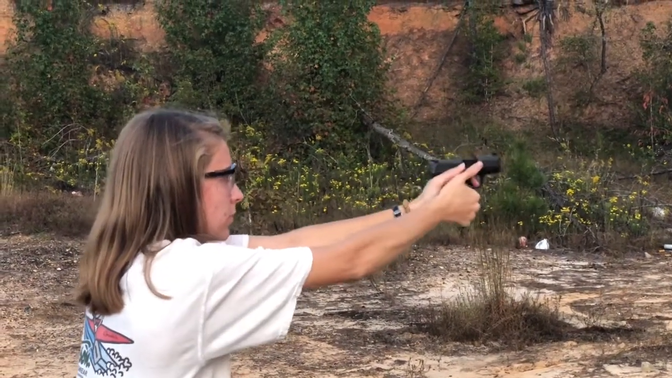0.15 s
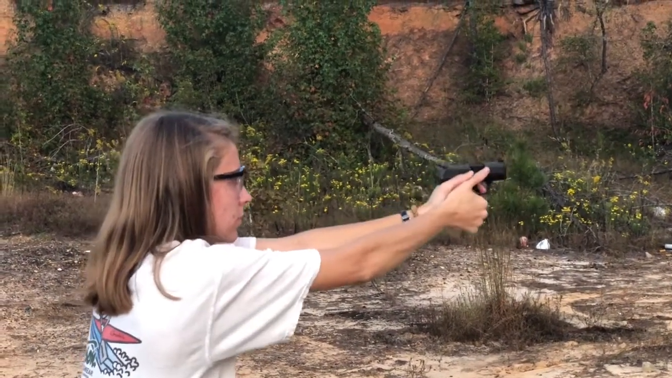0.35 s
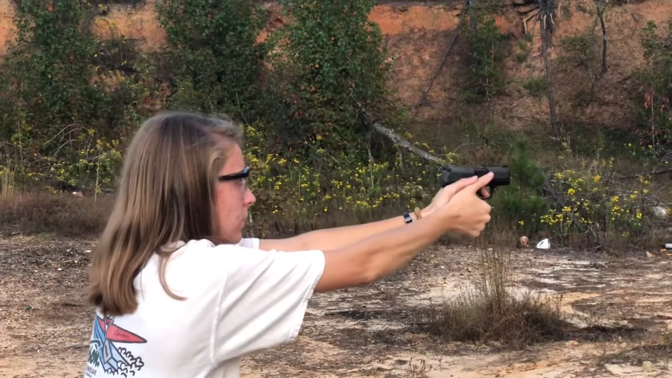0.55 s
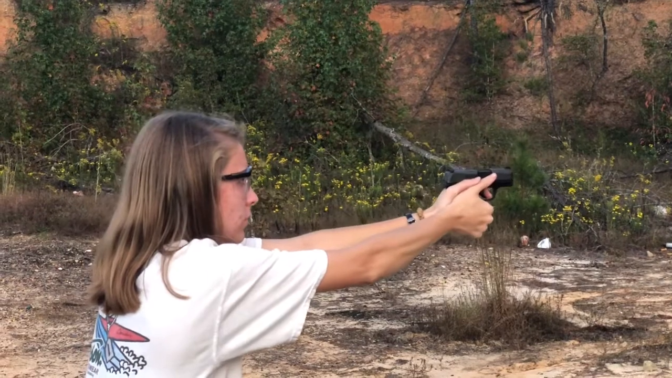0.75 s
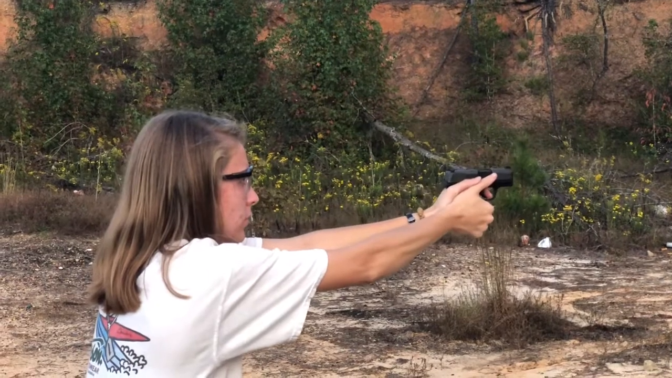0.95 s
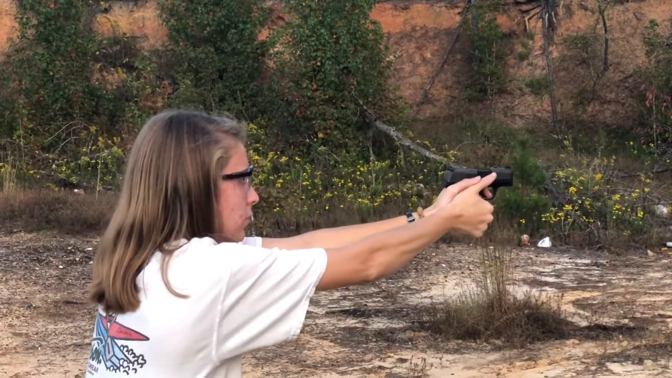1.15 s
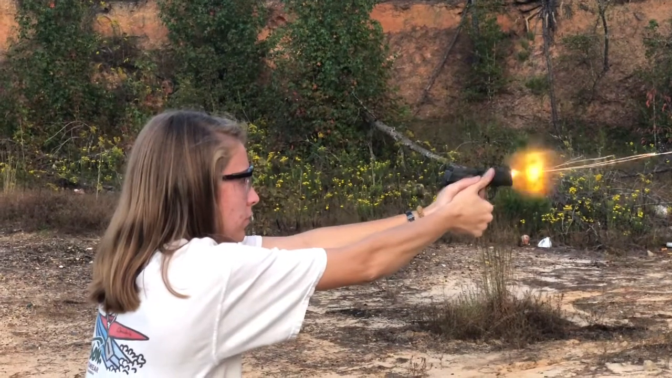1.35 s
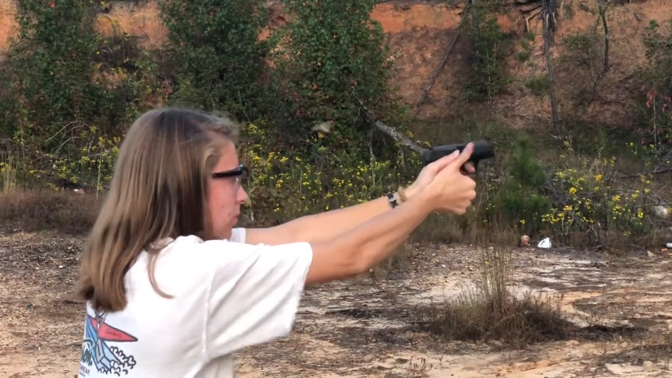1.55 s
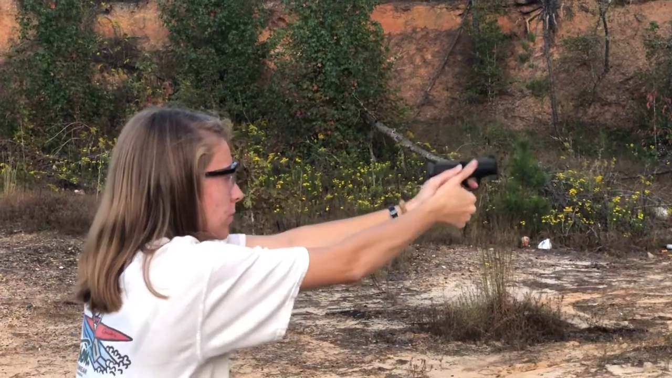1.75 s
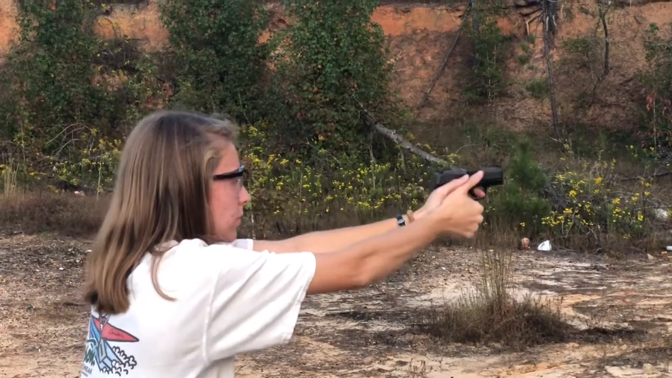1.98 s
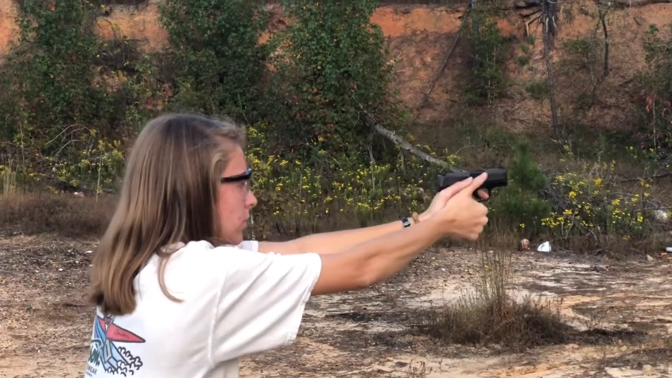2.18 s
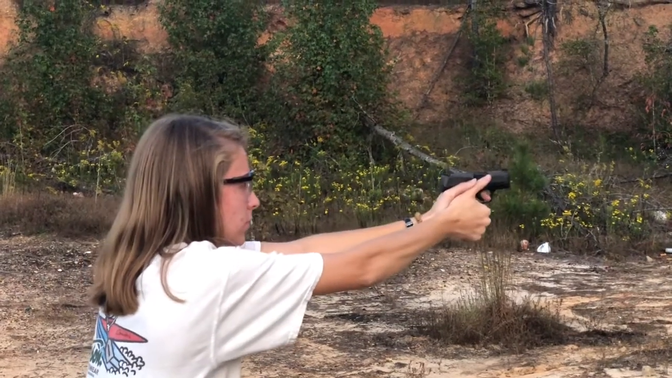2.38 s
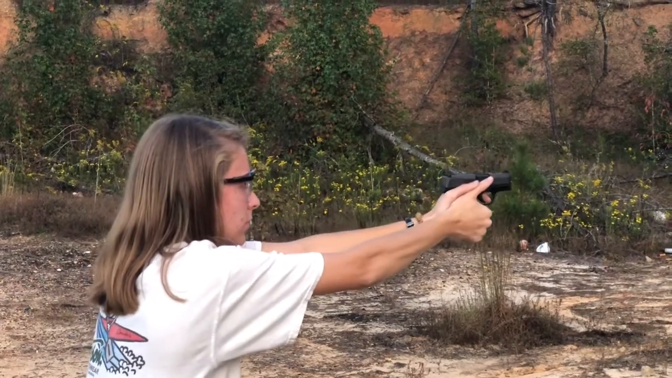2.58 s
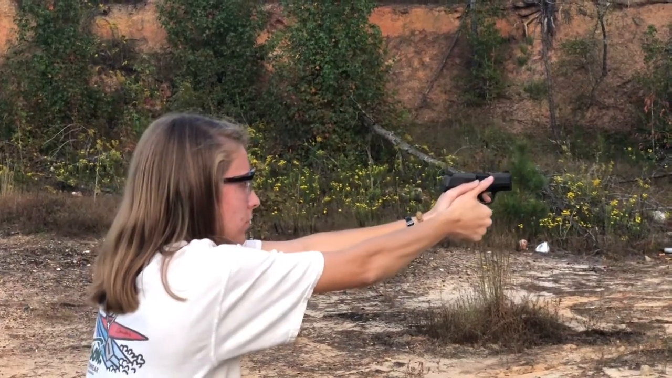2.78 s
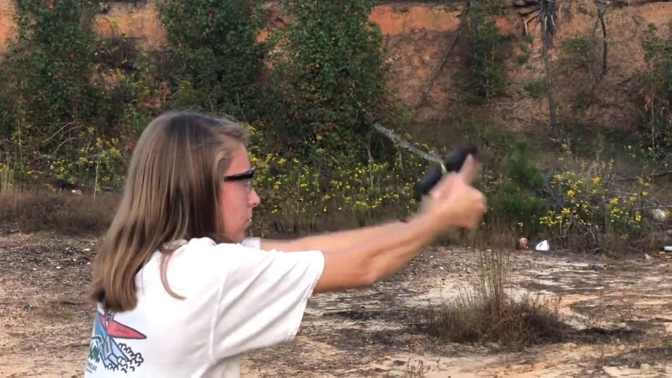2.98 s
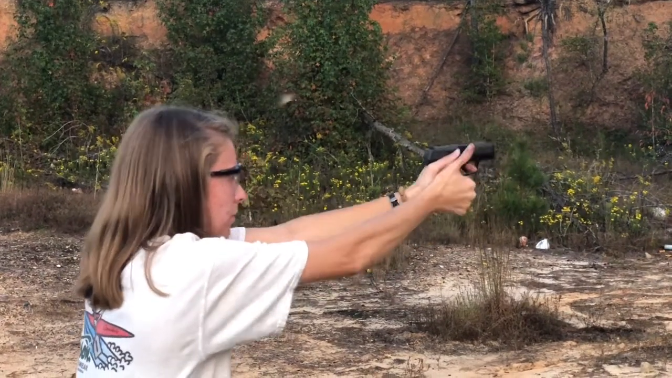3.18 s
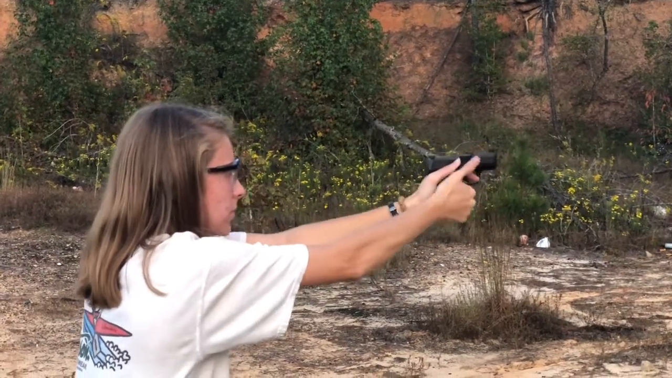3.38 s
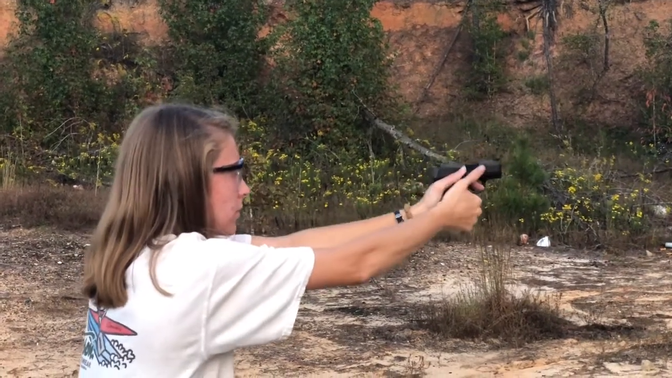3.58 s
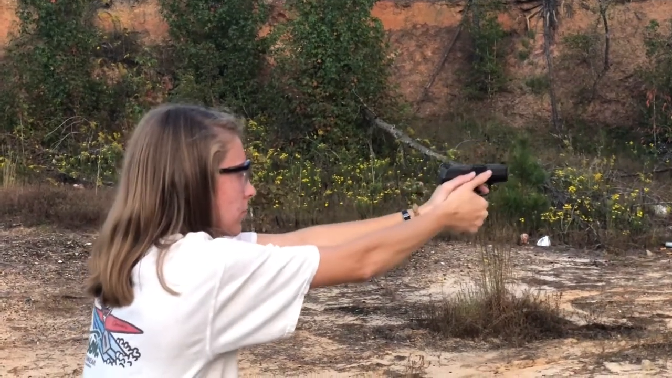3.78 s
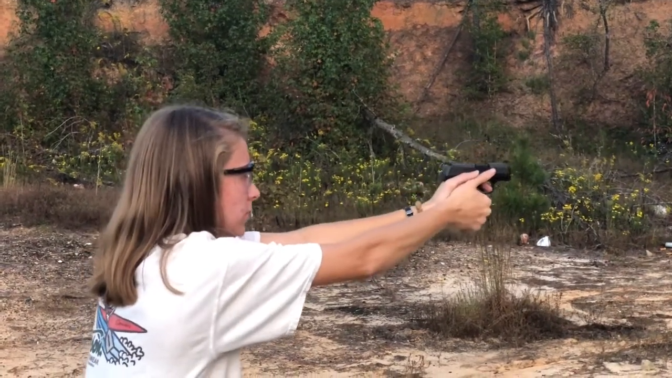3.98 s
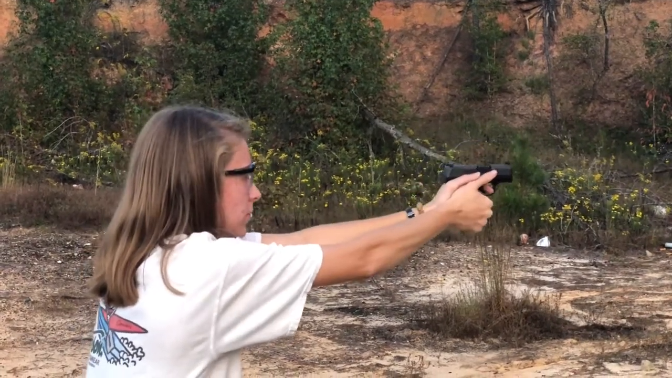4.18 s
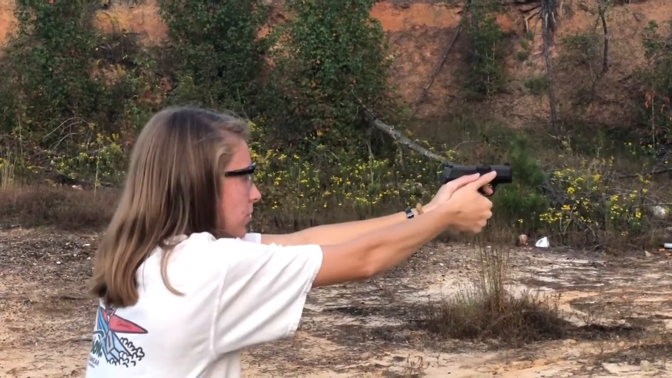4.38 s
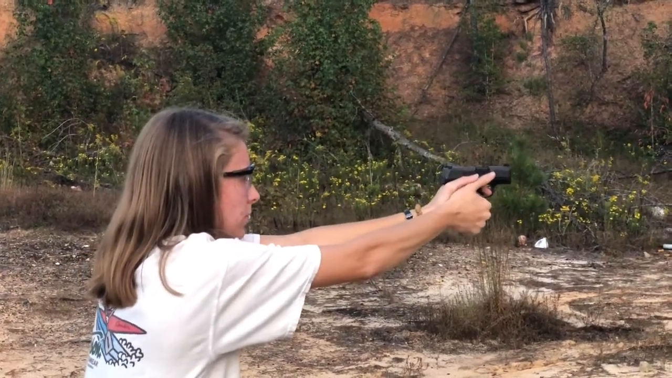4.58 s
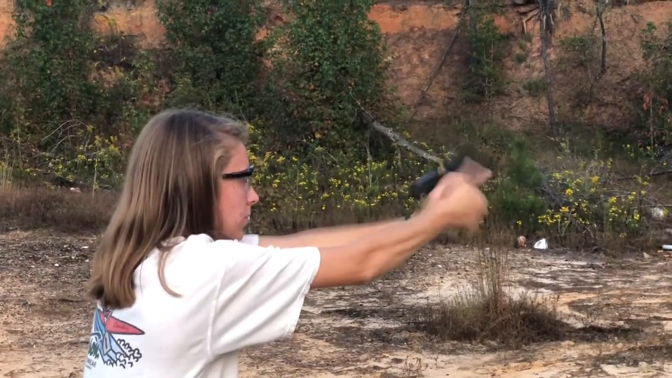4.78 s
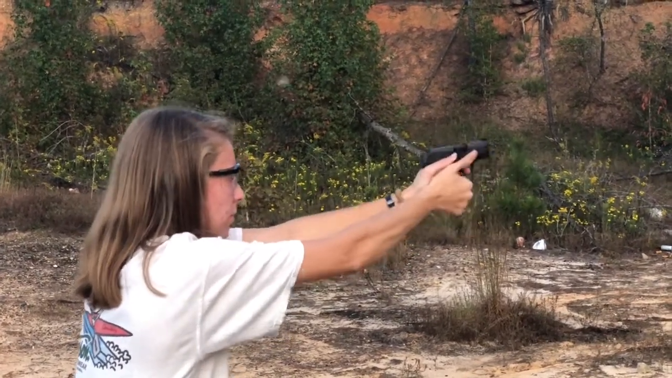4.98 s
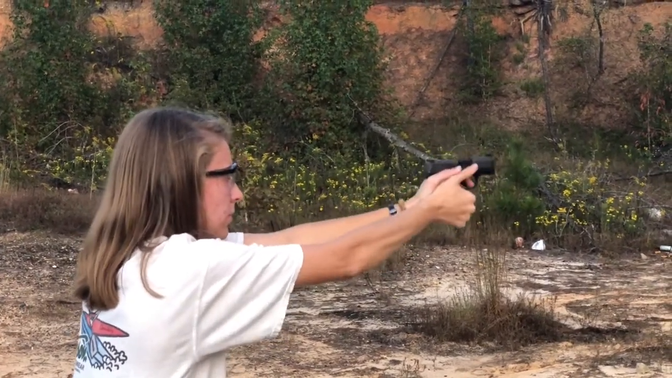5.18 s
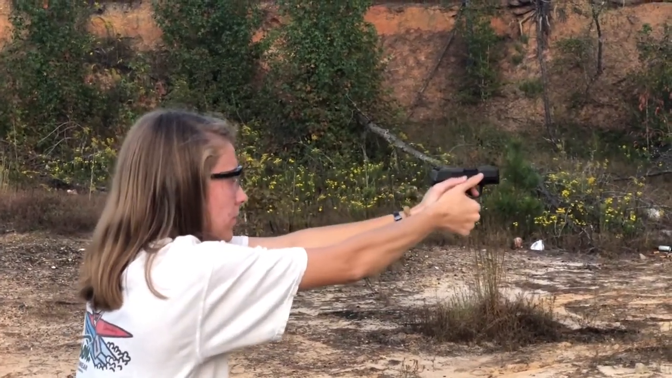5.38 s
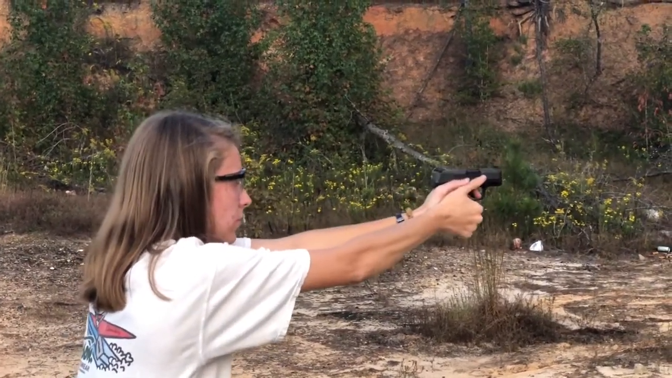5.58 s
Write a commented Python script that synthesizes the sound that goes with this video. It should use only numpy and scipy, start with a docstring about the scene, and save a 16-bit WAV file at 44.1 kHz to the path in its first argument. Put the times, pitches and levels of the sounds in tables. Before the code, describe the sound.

A pistol fires three sharp, close shots outdoors, each echoing away, with faint casing pings and distant insects in between.

```python
"""A semi-automatic pistol fires three aimed shots at an outdoor range, after the dying tail of another.
Each gas blast bounces off the ground, scatters from brush, booms from earth banks and lingers in far
woods; the slide slams shut and the casing lands with a ping. The small, close microphone overloads.
The recorder's gain drops at each shot and creeps back, lifting insects, faint rustle and a distant hum."""
import sys
import numpy as np
from scipy import signal
from scipy.fft import rfft, irfft, next_fast_len
from scipy.io import wavfile

SR = 44100
rng = np.random.default_rng(int(sys.argv[2]) if len(sys.argv) > 2 else 0)


def put_to_file(sound):
    """Save the sound as 16-bit audio at rate SR, in the file named by the first command-line argument."""
    columns = np.atleast_2d(sound).T  # one column per channel
    safe = np.clip(columns, -1, 1)
    whole_steps = np.round(safe * 32767)
    wavfile.write(sys.argv[1], SR, whole_steps.astype(np.int16))


N = 248724
TIME_S = np.arange(N) / SR
EVENT_S = np.arange(2 * SR) / SR

# noise spectra: f/Hz, level/dB
HUM_SPECTRUM = [(25, -14), (75, 6.5), (130, -3), (250, -13.5), (450, -12), (750, -8), (1150, -5.5),
                (1700, -16), (2700, -20), (5000, -27), (9000, -35), (16000, -38)]
INSECT_SPECTRUM = [(2500, -50), (3450, -18), (3750, 0), (4200, 0), (4450, -15), (5500, -50)]
WOODS_SPECTRUM = [(200, -21), (450, -11), (750, -1), (1200, 2), (1800, -6), (2800, -10.5), (6000, -17),
                  (14000, -20)]
BRUSH_SPECTRUM = [(40, -15), (120, -11), (280, -4.5), (500, -1), (1000, 3.5), (1700, 1), (3000, -1),
                  (6000, -3.5), (10000, -3.5), (16000, -12.5)]
CASING_CLICK_SPECTRUM = [(100, -10.5), (450, 3.5), (1000, -1), (2200, 3), (5000, -9), (10000, -12),
                         (15000, -11)]
GAS_SPECTRUM = [(200, -13), (700, 1), (1500, -.5), (3000, -2), (6000, -4), (11000, -5), (16000, -16)]
# damped modes: f/Hz, level/dB, t60/s
BRASS_MODES = [(10065, -7, .19), (10180, -2, .1)]
GROUND_KNOCK_MODES = [(206, -21.5, .058), (454.4, -8.5, .0235), (2300, -6, .016), (4105, -5, .0093)]
BLAST_MODES = [(401, -18, .09), (560, -7.5, .12), (712, -3, .03), (872, -8.5, .02), (1138, 0, .025),
               (1872, -7.5, .011), (2347, -8.5, .021)]
# rustle spells: t/s, spread/s, level/dB
RUSTLES = [(1.0, .25, -100), (2.55, .16, -91.5), (4.42, .2, -94.5)]
# earth bank echoes: delay/s, spread/s, level/dB, f/Hz
BANK_ECHOES = [(.036, .005, -25.5, 760), (.079, .005, -31, 720), (.098, .003, -29, 1300),
               (.14, .012, -23.5, 780), (.168, .005, -42, 160), (.2, .025, -39.5, 690),
               (.28, .01, -50, 1400), (.285, .009, -45.5, 470), (.328, .007, -57, 470),
               (.39, .028, -65, 710), (.482, .005, -68, 520)]
# casing landings: t/s, click/dB, ping/dB
LANDINGS = [(.3143, -54, -84), (2.0817, -63.5, -80), (3.7131, -55, -68), (5.5441, -73, -82)]
# slide strips a round, then shuts: delay/s, level/dB
SLIDE_HITS = [(.0455, -19), (.0515, -16.5)]
# lead-in tones: f/Hz, level/dB
LEAD_TONES = [(1200, -9), (1820, -3.5), (2110, -5), (2340, -2), (2540, -4), (3100, -1)]
# shots: t/s, level/dB, punch/dB, thump/dB, thump peak/s, dull lead-in/dB, ringing lead-in/dB, echo dip/dB
SHOTS = [(-.398, 2, -24, -36, .009, -18, -22, -12), (1.357, 3.3, -21.5, -45, .018, -20.5, -13, -16),
         (2.9584, 1.4, -27, -36.5, .024, -15.5, -22.5, -4),
         (4.7694, 1.4, -26.5, -43, .008, -15.5, -16, -16)]


def undb(db):
    """Decibels to gain."""
    return 10 ** (np.asarray(db) / 20)


def shaped(x, gain):
    """Filter by gain(f/Hz); rms 1."""
    size = next_fast_len(len(x))
    hz = np.maximum(np.fft.rfftfreq(size, 1 / SR), 1)
    y = irfft(rfft(x, size) * gain(hz), size)[:len(x)]
    return y / np.std(y)


def colour(x, spectrum):
    """Filter by a spectrum table; rms 1."""
    hz, db = np.transpose(spectrum)
    return shaped(x, lambda f: undb(np.interp(np.log(f), np.log(hz), db)))


def noise(spectrum, size=len(EVENT_S)):
    """Coloured noise; rms 1."""
    return colour(rng.standard_normal(size), spectrum)


def band(size, hz, octaves):
    """Noise in a bell-shaped band; rms 1."""
    return shaped(rng.standard_normal(size), lambda f: np.exp(-(np.log2(f / hz) / octaves / 2) ** 2))


def bell(t, centre_s, spread_s):
    """Gaussian swell, height 1."""
    return np.exp(-((t - centre_s) / spread_s / 2) ** 2)


def wander(t, rate_hz):
    """Random drift, spread near 1."""
    return np.interp(t * rate_hz, np.arange(4096), rng.standard_normal(4096))


def ring(modes):
    """Struck modes, decaying."""
    return sum(undb(db) * np.sin(2 * np.pi * hz * EVENT_S) * np.exp(-np.log(1000) * EVENT_S / t60_s)
               for hz, db, t60_s in modes)


def clack(spectrum, decay_s):
    """Dry knock of metal."""
    return noise(spectrum) * np.exp(-EVENT_S / decay_s)


def delayed(x, delay_s):
    """Delay an event."""
    return np.interp(EVENT_S - delay_s, EVENT_S, x, left=0)


def add(out, x, at_s):
    """Mix x into out from at_s on."""
    start = int(round(at_s * SR))
    lo, hi = max(start, 0), min(start + len(x), N)
    if hi > lo:
        out[lo:hi] += x[lo - start:hi - start]


def through_air(x, loss_db_per_s_khz=2.5):
    """Air absorbs more treble the longer the path."""
    hz, path_s, frames = signal.stft(x, SR, nperseg=256)
    loss_db = loss_db_per_s_khz * np.outer(hz / 1000, path_s)
    return signal.istft(frames * undb(-loss_db), SR)[1][:len(x)]


def countryside(hum_db=-84, insect_db=-86, waver_db=.6, trill_db=1.5, crackle_db=5):
    """Far hum, a narrow shimmering insect band, spells of dry rustle."""
    hum = noise(HUM_SPECTRUM, N) * undb(hum_db + waver_db * wander(TIME_S, rate_hz=11))
    insects = noise(INSECT_SPECTRUM, N) * undb(insect_db + trill_db * wander(TIME_S, rate_hz=90))
    rustle = band(N, hz=9000, octaves=.4) * undb(crackle_db * wander(TIME_S, rate_hz=380))
    spells = sum(undb(db) * bell(TIME_S, at_s, spread_s) for at_s, spread_s, db in RUSTLES)
    return hum + insects + rustle / np.std(rustle) * spells


def woods(level_db=-69, delay_s=.59, attack_s=.035, fade_db_per_s=10.5):
    """Distant trees return a late, long, soft wash."""
    late_s = EVENT_S - delay_s
    onset = (1 + np.tanh(late_s / attack_s)) / 2
    return through_air(noise(WOODS_SPECTRUM)) * onset * undb(level_db - fade_db_per_s * late_s)


def banks():
    """Each rough slope returns a dull, smeared burst."""
    out = np.zeros(len(EVENT_S))
    for delay_s, spread_s, db, hz in BANK_ECHOES:
        swell = bell(EVENT_S, delay_s, spread_s)
        echo = swell * band(len(EVENT_S), hz, octaves=.38)
        out += undb(db) * echo * np.linalg.norm(swell) / np.linalg.norm(echo)
    return out


def brush(level_db=-26.7, swell_db_per_s=48, edge_s=.148, fall_power=4.35,
          linger_db=-57, fade_db_per_s=24, grain_db=3.5, clump_db=1.7):
    """Clumped small reflections swell to the clearing's edge, then thin out; multiple scatter lingers."""
    sizes = undb(grain_db * rng.standard_normal(len(EVENT_S)) + clump_db * wander(EVENT_S, rate_hz=200))
    twigs = colour(rng.standard_normal(len(EVENT_S)) * sizes, BRUSH_SPECTRUM)
    swell = undb(level_db - swell_db_per_s * np.maximum(edge_s - EVENT_S, 0))
    fall = np.maximum(EVENT_S / edge_s, 1) ** -fall_power
    linger = undb(linger_db - fade_db_per_s * EVENT_S)
    return through_air(twigs) * np.hypot(swell * fall, linger)


def casings(bounce_s=.14, bounce_db=-17):
    """Each spent case knocks on the ground, pings and bounces once."""
    out, knock, ping = np.zeros(N), ring(GROUND_KNOCK_MODES), ring(BRASS_MODES)
    for at_s, click_db, ping_db in LANDINGS:
        click = clack(CASING_CLICK_SPECTRUM, decay_s=.0012)
        add(out, undb(click_db) * (click + knock) + undb(ping_db) * ping, at_s)
        add(out, undb(ping_db + bounce_db) * ping, at_s + bounce_s)
    return out


def slide(rasp_db=-27.5):
    """The slide rasps forward over a fresh round and slams shut."""
    out = undb(rasp_db) * noise(GAS_SPECTRUM) * bell(EVENT_S, centre_s=.042, spread_s=.006)
    for delay_s, db in SLIDE_HITS:
        out += undb(db) * delayed(clack(GAS_SPECTRUM, decay_s=.0014), delay_s)
    return out


def lead_in(dull_db, ring_db, lead_s, dull_s=.0058, ring_s=.0051,
            tick_db=-26.5, tick_s=.0016, haze_db=-41, murk_db=-37):
    """A tick and a short ringing swell rush into the crack."""
    t = EVENT_S[:4096]
    dull = undb(dull_db) * band(len(t), hz=350, octaves=.78) * np.exp(-abs(t - lead_s) / dull_s)
    tones = sum(undb(db) * np.sin(2 * np.pi * (hz * t + rng.random())) for hz, db in LEAD_TONES)
    ringing = undb(ring_db) * tones * np.exp(-abs(t - lead_s) / ring_s)
    murk = undb(murk_db) * band(len(t), hz=680, octaves=.4)
    tick = noise(GAS_SPECTRUM, len(t)) * (undb(tick_db) * np.exp(-t / tick_s) + undb(haze_db))
    return (dull + ringing + murk + tick) * (t < lead_s)


def pulse(hz, peak_s, spread_s):
    """A few slow pressure cycles: the low body of the report."""
    return np.sin(2 * np.pi * hz * EVENT_S) * bell(EVENT_S, peak_s, spread_s)


def blast(gas_db=-5.5, gas_s=.0019, wake_db=-19, wake_s=.0055, ground_s=.0047, ground_db=-9):
    """Sharp gas burst, then the boom of the expanding ball; the ground reflects both."""
    burst = undb(gas_db) * np.exp(-(EVENT_S / gas_s) ** 4)
    wake = undb(wake_db) * np.exp(-EVENT_S / wake_s)
    boom = ring(BLAST_MODES) * bell(EVENT_S, centre_s=.0048, spread_s=.0018)
    direct = noise(GAS_SPECTRUM) * (burst + wake) + boom
    return direct + undb(ground_db) * delayed(direct, ground_s)


def pistol(leaf_stir=.24, lead_s=.0228):
    """Each shot cycles the slide and wakes the same terrain; leaves stir a little between shots."""
    out = np.zeros(N)
    terrain = np.sqrt(1 - leaf_stir ** 2) * brush() + banks()
    punch = sum(pulse(hz, peak_s=.0057, spread_s=.0045) for hz in (155, 245))
    for at_s, db, punch_db, thump_db, thump_s, dull_db, ring_db, dip_db in SHOTS:
        dip = undb(dip_db * bell(EVENT_S, centre_s=.0605, spread_s=.0025))
        echoes = (terrain + leaf_stir * brush()) * dip
        thump = pulse(hz=62, peak_s=thump_s, spread_s=.006)
        add(out, undb(db) * (blast() + echoes) + woods(), at_s)
        add(out, undb(punch_db) * punch + undb(thump_db) * thump, at_s)
        add(out, lead_in(dull_db, ring_db, lead_s), at_s - lead_s)
        add(out, slide(), at_s)
    return out


def scene():
    """Pistol and range, mono."""
    return (pistol() + casings() + countryside())[None]


def gain_control(x, ceiling, start_db=4.2, max_db=15, recover_db_per_s=10, look_ahead_s=.025):
    """Gain drops just ahead of each peak to hold the ceiling, then recovers steadily."""
    headroom_db = -20 * np.log10(np.maximum(abs(x[0]) / ceiling, undb(-max_db)))
    recovery_db = recover_db_per_s * TIME_S
    gain_db = recovery_db + np.minimum(np.minimum.accumulate(headroom_db - recovery_db), start_db)
    return x * undb(np.interp(TIME_S + look_ahead_s, TIME_S, gain_db))


def record(dry, ceiling=.7, hiss_db=-85, notch_hz=2780, notch_width_hz=260, notch_db=-6,
           low_cut_hz=40, high_cut_hz=15750):
    """Microphone overload, gain ducking, steady hiss, a narrow treble notch, band limits."""
    clipped = dry / (1 + (dry / ceiling) ** 6) ** (1 / 6)
    ducked = gain_control(clipped, ceiling) + undb(hiss_db) * rng.standard_normal(N)
    notch_band = signal.lfilter(*signal.iirpeak(notch_hz, notch_hz / notch_width_hz, fs=SR), ducked)
    notched = ducked - notch_band * (1 - undb(notch_db))
    thinned = signal.sosfilt(signal.butter(2, low_cut_hz, "high", fs=SR, output="sos"), notched)
    return signal.fftconvolve(thinned, signal.firwin(255, high_cut_hz, fs=SR)[None], mode="same")


dry = scene()
out = record(dry)
put_to_file(out)
```